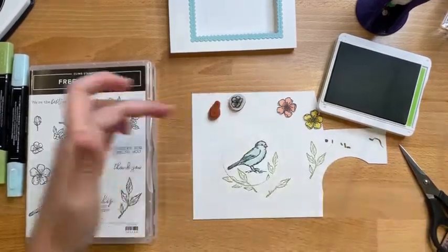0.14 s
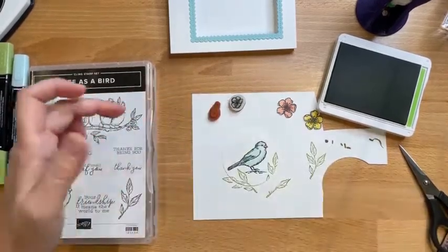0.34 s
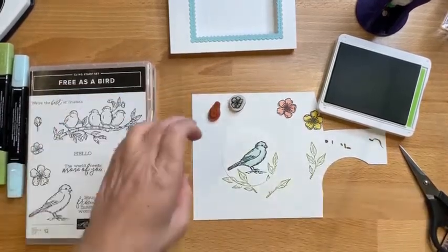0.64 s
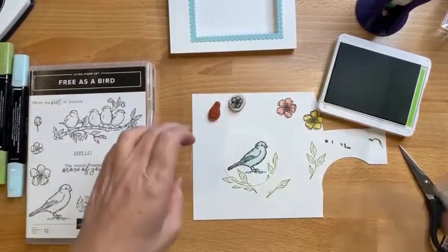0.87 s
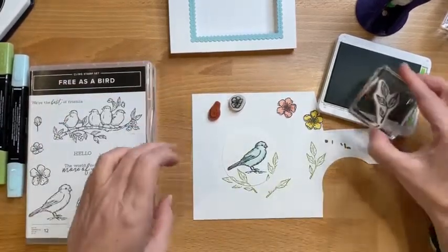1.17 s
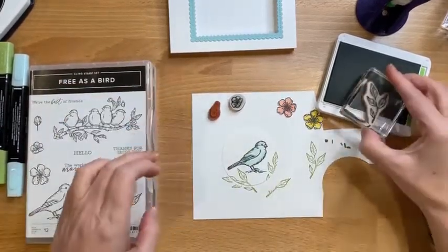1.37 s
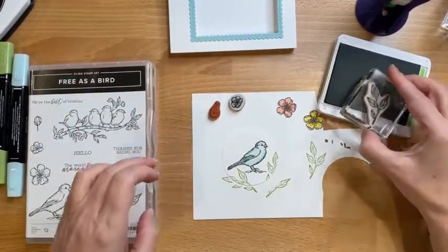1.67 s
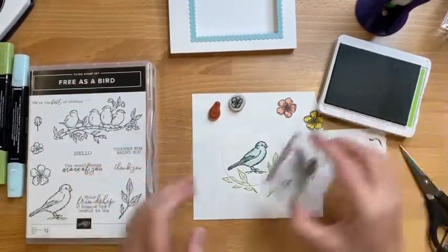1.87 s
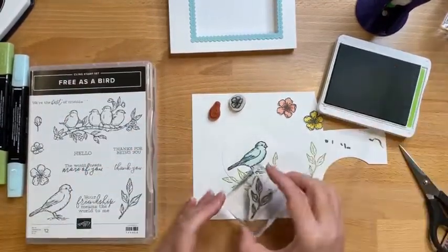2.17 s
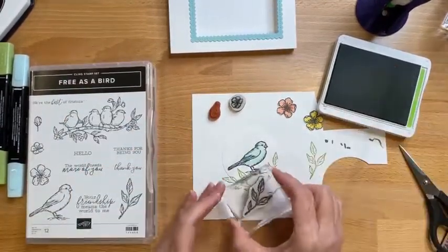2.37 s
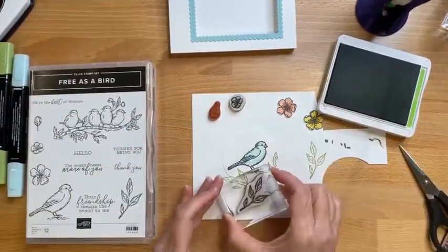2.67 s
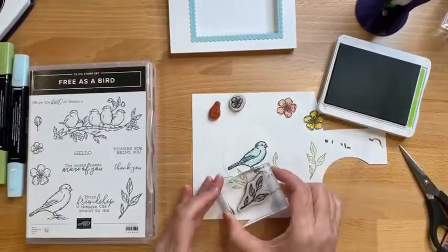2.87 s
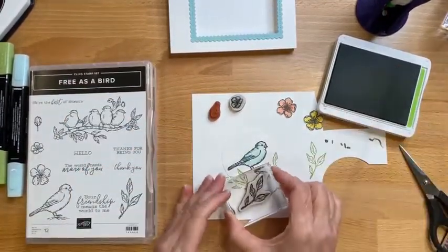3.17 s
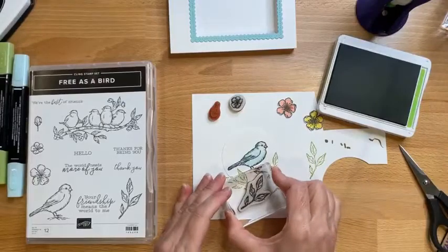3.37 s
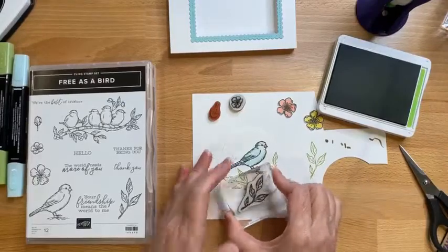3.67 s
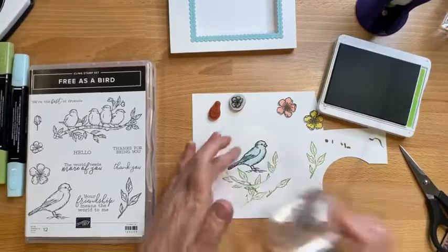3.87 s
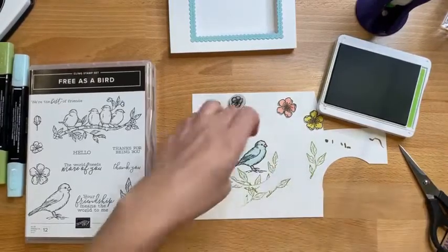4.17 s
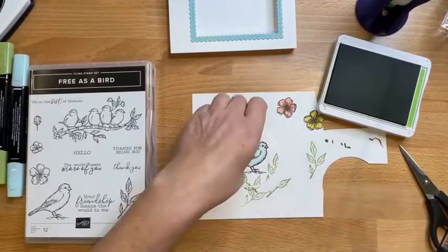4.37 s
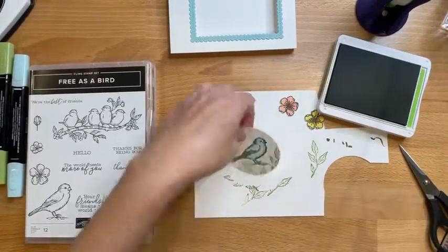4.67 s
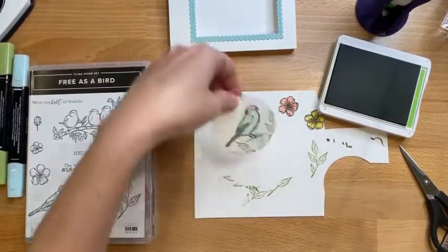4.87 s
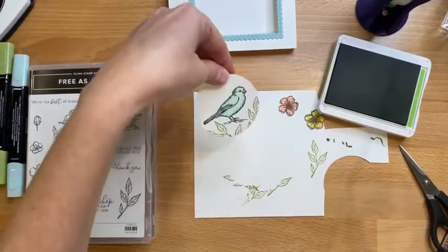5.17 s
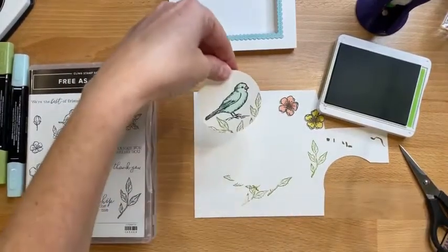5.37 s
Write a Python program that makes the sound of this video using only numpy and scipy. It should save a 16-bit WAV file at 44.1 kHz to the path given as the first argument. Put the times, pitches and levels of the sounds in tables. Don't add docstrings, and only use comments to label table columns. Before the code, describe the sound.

In a quiet humming room, a hard plastic block clatters sharply on an ink pad tray, then card rustles, snaps and a finger knocks the desk.

```python
import sys
import numpy as np
from scipy import signal
from scipy.fft import rfft, irfft, next_fast_len
from scipy.io import wavfile

SR = 44100
rng = np.random.default_rng(int(sys.argv[2]) if len(sys.argv) > 2 else 0)


def waveform_to_disk(signal):
    frames = np.transpose(np.atleast_2d(signal))
    scaled = np.clip(frames, -1, 1) * 32767
    samples = np.round(scaled).astype(np.int16)
    wavfile.write(sys.argv[1], SR, samples)


def how_loud(loudness_db):
    steps = np.asarray(loudness_db, float) / 20
    return 10 ** steps


N = 243431

# [f/Hz, rms level/dB, sway/dB]
HUM_TONES = [
    (60.1, -74.5, 0),
    (119.93, -55.5, 0.4),
    (1443, -95, 2),
]
# [f/Hz, density/dB per Hz]
RUMBLE_SPECTRUM = [(25, -37.5), (40, -18), (52, -8.5), (70, -2), (95, -0.5), (135, 7), (165, -5),
                   (210, -14), (300, -45)]
# [f/Hz, density/dB per Hz]
AIR_SPECTRUM = [(90, -39.5), (150, -0.5), (210, -5), (250, -11), (480, -15), (850, -19), (1250, -22),
                (1500, -19.5), (2100, -25.5), (5200, -29.5), (9000, -33), (11000, -39.5), (13500, -49.5),
                (16000, -51)]
# [full pressure from t/s, held t/s, swell t/s, level/dB, lightness 0 rustle - 1 finest hiss]
STROKES = [(.108, 0.0055, 0.011, -66.5, 0.8), (.13, 0.037, 0.03, -85, 0.74), (.782, 0.0037, .01, -78, 0.75),
           (2.22, 0.044, 0.039, -96, 1.2), (2.52, .13, 0.056, -86, 0.84),
           (3.832, 0.015, 0.013, -72.5, 0.45), (3.865, 0.026, 0.047, -65.5, 0.21),
           (4.005, 0.017, 0.021, -72.5, 0.79), (4.12, 0.06, 0.05, -79.5, .85),
           (4.163, 0.0077, 0.024, -73, 1.2), (4.28, 0.1, 0.071, -85, .9), (4.46, 0.062, 0.018, -82.5, 1.15),
           (4.518, 0.0036, 0.0087, -78, .45), (4.545, 0.014, 0.014, -68, .6),
           (4.688, 0.046, 0.0078, -74, 0.51), (4.734, 0.044, 0.04, -56.5, 0.13),
           (4.799, 0.06, 0.013, -60.5, 0.1), (4.86, .012, 0.017, -60.5, 0.13),
           (4.885, 0.015, .06, -75, 0.31), (5.039, 0.0031, 0.017, -71.5, 0.052),
           (5.06, 0.074, .04, -86.5, 0.87)]
# [f/Hz, density/dB per Hz]
CARD_SPECTRUM = [(700, -43), (1200, 2.5), (2000, 1.5), (3200, 4.5), (4500, 3), (7000, -34)]
# [f/Hz, density/dB per Hz]
SKIN_SPECTRUM = [(3000, -79), (5000, -8.5), (7000, -5.5), (9500, -9), (13000, -41)]
# [f/Hz, density/dB per Hz]
FINE_SPECTRUM = [(7500, -7.5), (11000, 1.5), (14000, 3), (17000, -2)]
# [t/s, peak level/dB, f/Hz]
SNAP_EVENTS = [(0.1096, -52, 9100), (0.783, -64, 8100), (3.8404, -46, 3300), (4, -62.5, 5110),
               (4.0055, -58, 5435), (4.1659, -59, 10300), (4.4629, -58.5, 9300), (4.5062, -58, 5830),
               (4.52, -59, 4960), (4.6884, -58, 3400), (4.788, -44, 3080), (4.868, -37.5, 5600),
               (4.865, -42.5, 5500), (5.041, -57, 1810)]
# [full pressure from t/s, held t/s, swell t/s, level/dB]
PALM_STROKES = [
    (.38, 0.012, 0.037, -76),
    (.445, 0.0065, 0.022, -71),
    (3.5, 0.16, .05, -81.5),
    (3.92, 0.1, 0.036, -77),
    (4.4, 0.12, 0.18, -74.5),
    (4.52, .015, 0.064, -71.5),
]
# [f/Hz, density/dB per Hz]
PALM_SPECTRUM = [(150, -20), (240, 4), (420, 0.5), (700, -3.5), (950, -18.5), (1200, -4), (1600, -3),
                 (2000, -37)]
# [t/s, peak level/dB, edge click level/dB, desk thump level/dB, favoured ring f/Hz]
TAP_EVENTS = [(1.5555, -51.5, 4.5, -11, 930), (1.5612, -43.5, -30, -6.5, 515), (1.6265, -54, -5.5, 8, 702),
              (1.6591, -42.5, -16.5, -7.5, 777), (1.6968, -42, -22.5, -31.5, 790),
              (1.7027, -39, -41, -11, 506), (1.766, -40.5, 3.5, -0.5, 750),
              (1.8048, -35.5, 13, -10.5, 1490), (1.8068, -22, -7.5, -3, 945),
              (1.8136, -29.5, -13.5, -3.5, 1010), (1.873, -41, -2.5, -1.5, 600),
              (1.8959, -35.5, -22.5, -17, 800)]
# [f/Hz, level/dB, t60/s]
TRAY_MODES = [(395, -20.5, 0.0098), (490, -9, 0.03), (600, -10.5, 0.031), (764.4, -7, 0.028),
              (894, -8.5, 0.023), (945, -7.5, 0.033), (1290, -14, 0.05), (1396, -9, 0.07)]
# [f/Hz, level/dB, t60/s]
EDGE_MODES = [(1545, -9, 0.017), (1760, -13.5, 0.042), (1898, 0.5, 0.017), (2220, -6.5, 0.014),
              (2520, 3, 0.021), (2950, -6.5, 0.0065), (3470, -10.5, 0.021), (3730, -2.5, 0.0068),
              (4430, -12.5, 0.011), (5385, -8, 0.0054), (6160, -6.5, 0.0034), (8000, -23, 0.0035)]
# [f/Hz, level/dB, t60/s]
DESK_MODES = [(161, -9, 0.12), (203, 3.5, 0.046), (240.4, 1.5, 0.064), (317.3, -10, 0.026)]
# [t/s, peak level/dB, contact cut-off f/Hz, desk thump level/dB, nail click level/dB]
KNOCK_EVENTS = [
    (4.7202, -41.5, 910, -19.5, -30),
    (4.7266, -44, 3480, -32, 15.5),
    (4.7294, -38.5, 2500, 7.5, -37),
    (4.7339, -39.5, 900, 6.5, -20),
]
# [f/Hz, level/dB, t60/s]
KNOCK_BODY_MODES = [(517, -2, 0.017), (600, -7.5, 0.038), (738, 0.5, 0.2)]
# [f/Hz, level/dB, t60/s]
THUMP_MODES = [(148.6, -16, 0.056), (233, -7.5, 0.089), (332, -3, 0.055)]
# [f/Hz, level/dB, t60/s]
NAIL_MODES = [(1527, -15.5, 0.035), (1810, -19, 0.057), (2400, -7, 0.021), (2900, -15, 0.015),
              (3400, -2.5, 0.0046)]
# [f/Hz, t60/s]
ROOM_DECAY = [(150, .5), (400, 0.34), (900, 0.4), (1600, 0.45), (2700, 0.31), (6000, 0.25), (11000, 0.27)]


def rms_one(x):
    return x / np.sqrt(np.mean(x ** 2) + 1e-20)


def at_hz(points, hz):
    table = np.array(points)
    return np.interp(np.log(hz), np.log(table[:, 0]), table[:, 1])


def coloured(white, spectrum):
    size = next_fast_len(len(white))
    hz = np.maximum(np.fft.rfftfreq(size, 1 / SR), 1)
    shaped = irfft(rfft(white, size) * how_loud(at_hz(spectrum, hz)), size)
    return rms_one(shaped[:len(white)])


def drift(rate_hz):
    r = np.exp(-2 * np.pi * rate_hz / SR)
    wander = signal.lfilter([1], [1, -2 * r, r * r], rng.standard_normal(N + SR))
    return rms_one(wander[SR:])


def background(rumble_db=-66, air_db=-75, patchy_db=0.25):
    t, hum = np.arange(N) / SR, 0
    for hz, db, sway_db in HUM_TONES:
        hum = hum + np.sqrt(2) * how_loud(db + sway_db * drift(0.96)) * np.sin(2 * np.pi * hz * t)
    rumble = how_loud(rumble_db) * coloured(rng.standard_normal(N), RUMBLE_SPECTRUM)
    air = how_loud(air_db + patchy_db * drift(3.3)) * coloured(rng.standard_normal(N), AIR_SPECTRUM)
    return hum + rumble + air


def ring(push, hz, t60):
    r, w = how_loud(-60 / (t60 * SR)), 2 * np.pi * hz / SR
    return signal.lfilter([0, np.sin(w)], [1, -2 * r * np.cos(w), r * r], push)


def pressure(strokes, swell_db=22.5, release_stretch=1.25):
    s, held, swell, level_db = np.transpose(strokes)[:4, :, None]
    t = np.arange(N) / SR
    away = np.maximum(s - t, 0) + np.maximum(t - s - held, 0) / release_stretch
    return how_loud(level_db - np.minimum(swell_db * away / np.maximum(swell, 0.003), 90))


def flecks(per_s=600.0, size_db=4.0, cycles=40.0):
    sizes = how_loud(size_db * np.minimum(rng.exponential(1, N), 4))
    flicks = sizes * rng.choice([-1, 1], N) * (rng.random(N) < per_s / SR)
    dealt, out = rng.integers(0, 16, N), 0
    for k, hz in enumerate(np.geomspace(1200, 15000, 16)):
        out = out + np.sqrt(hz / 10) * ring(flicks * (dealt == k) + 1e-18, hz, cycles / hz)
    return rms_one(out)


def rubbing(fleck_db=-10.5, flutter_db=2.2):
    gains, light, out = pressure(STROKES), np.array(STROKES)[:, 4], 0
    grains = rng.standard_normal(N) + how_loud(fleck_db) * flecks()
    card_loss = 23 * light
    skin_loss = 31.5 * (light - 0.47) ** 2 * 2
    fine_loss = 15 * (1 - light)
    layers = [(card_loss, CARD_SPECTRUM), (skin_loss, SKIN_SPECTRUM), (fine_loss, FINE_SPECTRUM)]
    for loss_db, spectrum in layers:
        flutter = how_loud(-flutter_db * drift(27.0))
        out = out + coloured(grains, spectrum) * (how_loud(-loss_db) @ gains) * flutter
    return out


def add(out, s, sound):
    i = round(s * SR)
    out[i:i + len(sound)] += sound[:N - i]


def snaps(life_s=0.00083, cycles=11.0):
    out, t = np.zeros(N), np.arange(SR // 40) / SR
    for s, level_db, hz in SNAP_EVENTS:
        burst = rng.standard_normal(len(t)) * np.exp(-t / life_s)
        crack = signal.sosfilt(signal.butter(2, 0.98 * hz, "high", fs=SR, output="sos"), burst)
        crack = crack + 1.15 * ring(crack, hz, cycles / hz)
        add(out, s, how_loud(level_db) * crack / np.abs(crack).max())
    return out


def palm():
    return pressure(PALM_STROKES).sum(axis=0) * coloured(rng.standard_normal(N), PALM_SPECTRUM)


def contact(contact_hz):
    click = signal.unit_impulse(SR // 4) + 1e-18
    cutoff_hz = np.clip(contact_hz, 200, 15000)
    return signal.sosfilt(signal.bessel(3, cutoff_hz, fs=SR, output="sos", norm="mag"), click)


def struck(push, modes):
    out = 0
    for k, (hz, db, t60) in enumerate(modes):
        sign = 1 if 370 < hz < 1460 else (-1) ** k
        out = out + sign * how_loud(db) * ring(push, hz, t60)
    return out


def tray_under_blow(level_db, favoured_hz, favour_db=11.5):
    modes = []
    for hz, db, t60 in TRAY_MODES:
        favour = favour_db * np.exp(-(np.log2(hz / favoured_hz) / 0.081) ** 2)
        wake = (hz > 1200) * 0.57 * (level_db + 23)
        modes.append((hz, db + favour + wake, t60))
    return modes


def taps(spread_db=5.0, crack_db=4.0, grit_db=-12.0, grit_s=0.005):
    out, t = np.zeros(N), np.arange(SR // 4) / SR
    crack_filter = signal.butter(2, 1150, "high", fs=SR, output="sos")
    for s, level_db, edge_db, desk_db, favoured_hz in TAP_EVENTS:
        push = contact(3300 * 2 ** (edge_db / 18.5))
        modes = tray_under_blow(level_db, favoured_hz)
        modes += [(hz, db + edge_db, t60) for hz, db, t60 in EDGE_MODES]
        modes += [(hz, db + desk_db, t60) for hz, db, t60 in DESK_MODES]
        modes = np.array(modes) + np.outer(rng.standard_normal(len(modes)), [0, spread_db, 0])
        grit = rng.standard_normal(len(t)) * np.exp(-t / grit_s)
        crack = push + how_loud(grit_db) * signal.fftconvolve(push, grit)[:len(t)]
        crack = signal.sosfilt(crack_filter, crack)
        add(out, s, how_loud(level_db - 1.5) * (struck(push, modes) + how_loud(crack_db + edge_db) * crack))
    return out


def knocks():
    out = np.zeros(N)
    for s, level_db, contact_hz, thump_db, nail_db in KNOCK_EVENTS:
        push = contact(contact_hz)
        sound = struck(push, KNOCK_BODY_MODES)
        sound = sound + how_loud(thump_db) * struck(push, THUMP_MODES)
        sound = sound + how_loud(nail_db) * struck(push, NAIL_MODES)
        add(out, s, how_loud(level_db) * sound)
    return out


def room(x, level_db=-12.5, rise_s=0.009):
    t, tail = np.arange(SR * 3 // 4) / SR, 0
    edges = 90 * 2 ** np.arange(0, 7.6, 0.5)
    for low, high in zip(edges, edges[1:]):
        band_filter = signal.butter(2, [low, high], "band", fs=SR, output="sos")
        band = signal.sosfilt(band_filter, rng.standard_normal(len(t)))
        tail = tail + band * how_loud(-60 * t / at_hz(ROOM_DECAY, np.sqrt(low * high)))
    tail = tail * (1 - np.exp(-(t / rise_s) ** 2))
    return how_loud(level_db) * signal.fftconvolve(x, tail / np.sqrt(np.sum(tail ** 2)))[:N]


def scene():
    friction = snaps() + rubbing()
    no_deep_bass = signal.butter(3, 120, "high", fs=SR, output="sos")
    blows = signal.sosfilt(no_deep_bass, palm() + taps() + knocks())
    reflections = room(blows + how_loud(-6) * friction)
    return (blows + friction + reflections + background())[None]


def low_pass(x):
    return signal.sosfilt(signal.butter(12, 16040, fs=SR, output="sos"), x)


def record(dry):
    top_cut = signal.cheby2(12, 60, 16500, fs=SR, output="sos")
    mix = signal.sosfilt(top_cut, dry)
    return low_pass(mix)


dry = scene()
out = record(dry)
waveform_to_disk(out)
```